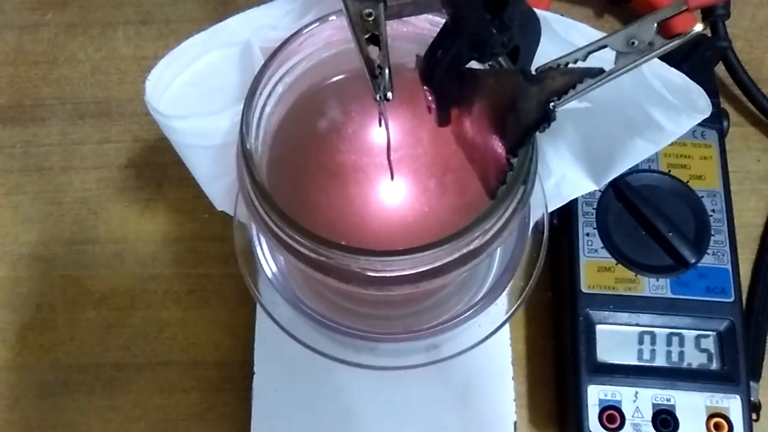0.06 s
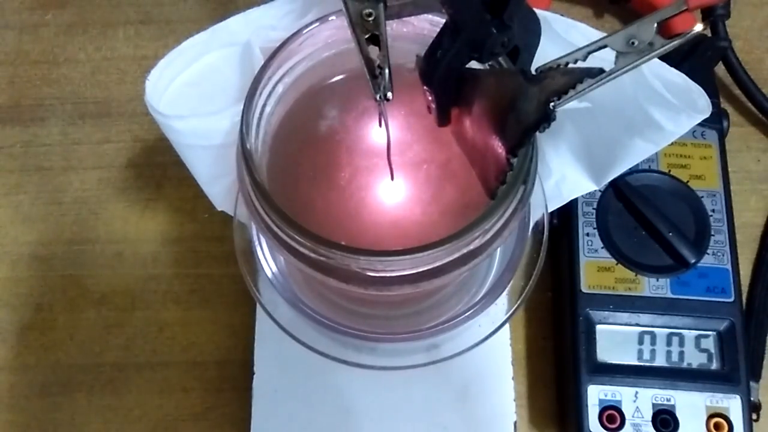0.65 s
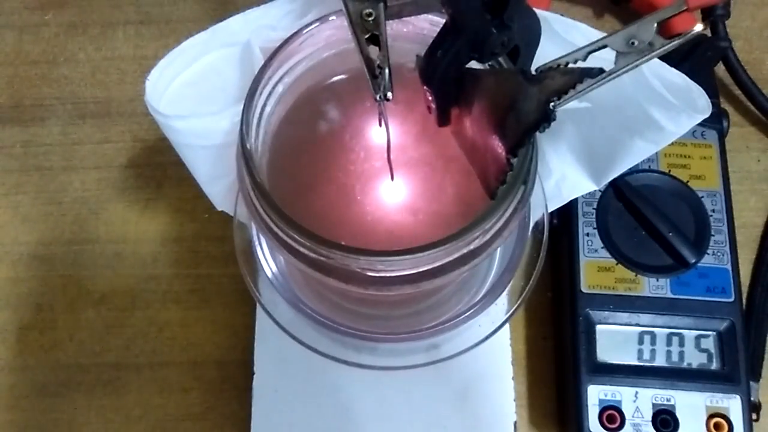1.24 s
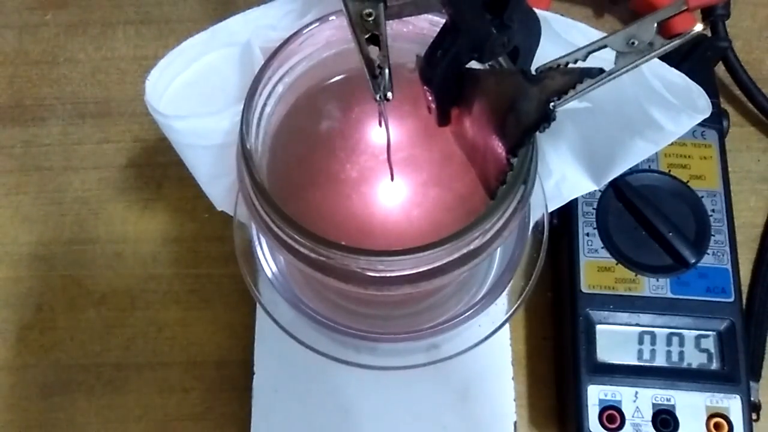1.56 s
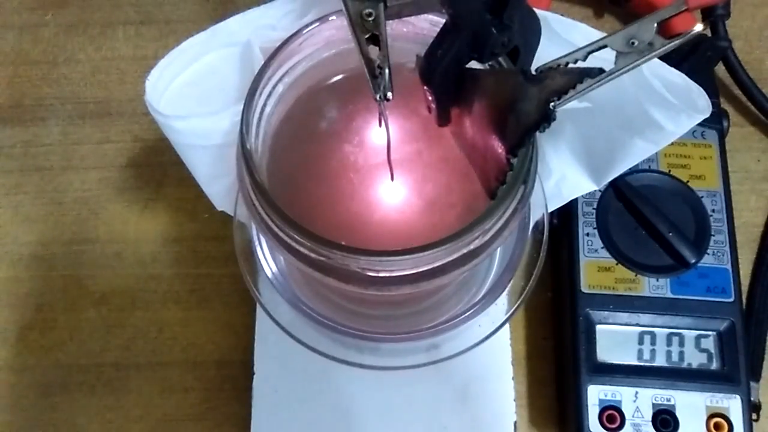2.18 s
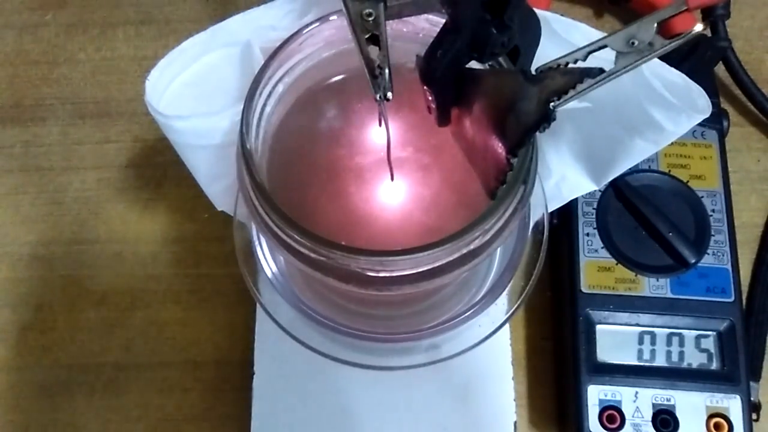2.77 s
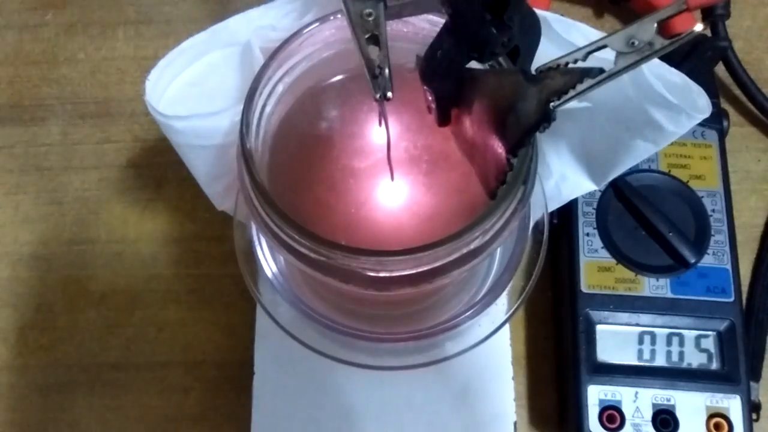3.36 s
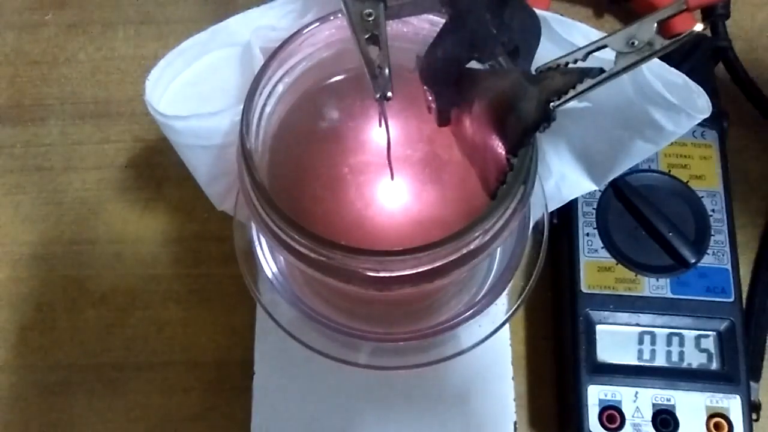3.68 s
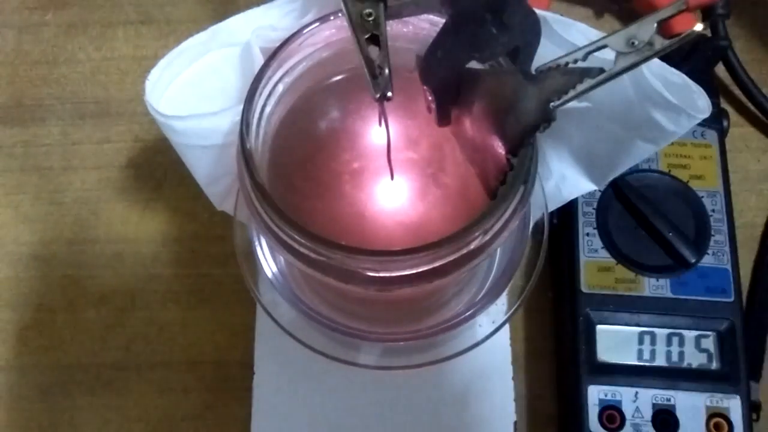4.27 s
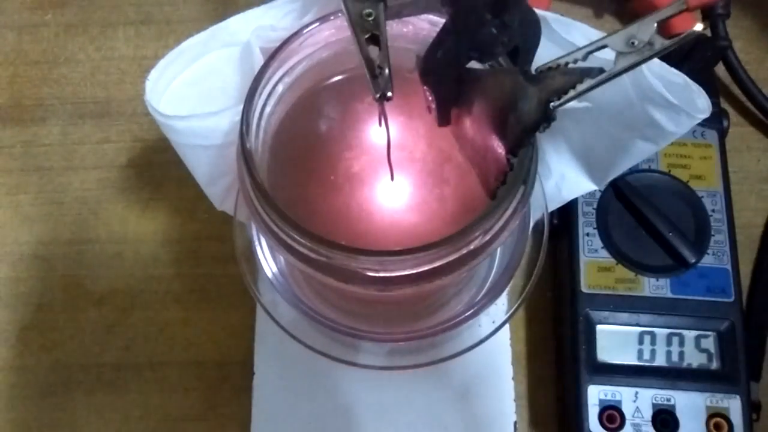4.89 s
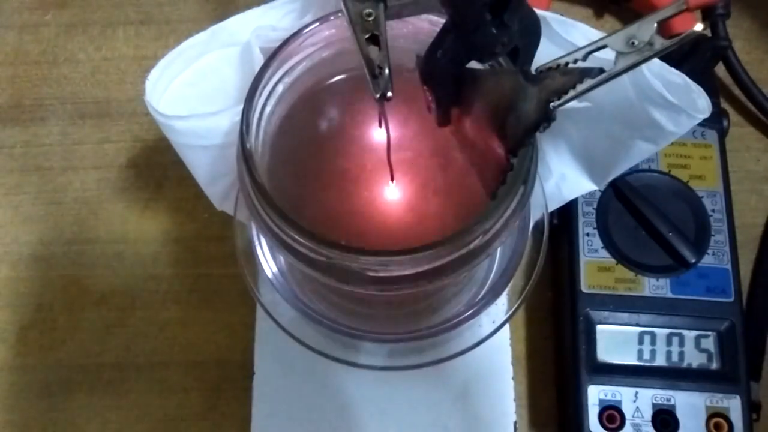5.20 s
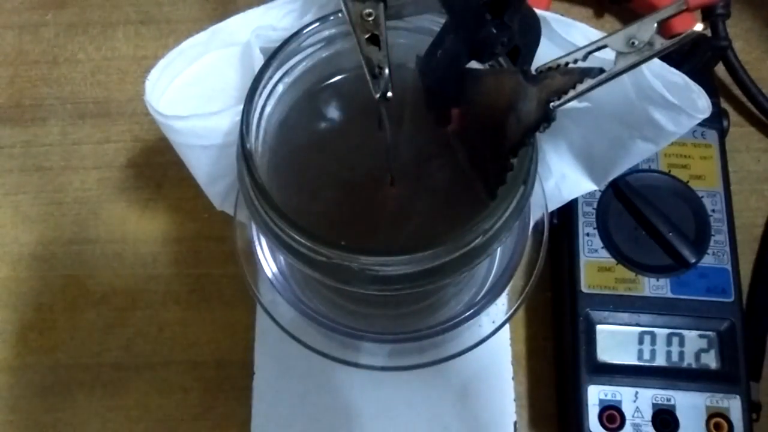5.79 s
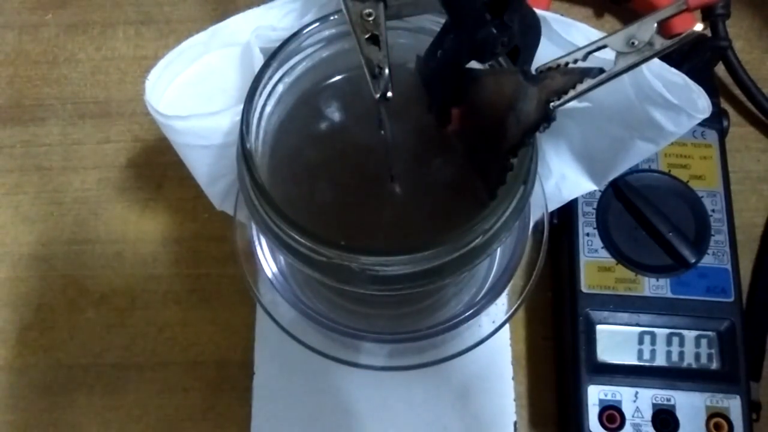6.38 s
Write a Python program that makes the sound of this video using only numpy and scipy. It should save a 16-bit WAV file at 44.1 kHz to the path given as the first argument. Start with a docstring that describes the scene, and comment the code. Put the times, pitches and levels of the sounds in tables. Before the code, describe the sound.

An electric discharge hisses and sizzles in a jar until a switch clicks off, then the hot wire softly fizzes and ticks.

```python
"""Plasma electrolysis in a glass jar: sparks sizzle round a wire in the liquid, throbbing with the
rectified mains over a faint supply hum. The power switch snaps off and the sizzle dies away in a
small room. The glowing wire then quenches: its vapour film ticks and breaks, and the liquid boils
on it in a short soft hiss. Mono, close by."""
import sys
import numpy as np
from scipy import signal
from scipy.fft import rfft, irfft, next_fast_len
from scipy.io import wavfile

SR = 44100
rng = np.random.default_rng(int(sys.argv[2]) if len(sys.argv) > 2 else 0)


def wav_out(sig):
    """Save sig, one row per channel (or a flat mono array), as 16-bit PCM at SR to the path in sys.argv[1]."""
    wavfile.write(sys.argv[1], SR, np.round(np.clip(np.atleast_2d(sig).T, -1, 1) * 32767).astype(np.int16))


N = 293265
T = np.arange(N) / SR
MAINS_HZ, POWER_OFF_S = 50, 5.276


def amp(db):
    """Decibels to gain."""
    return 10 ** (np.asarray(db) / 20)


def unit(x):
    """Scale to rms 1."""
    return x / np.sqrt(np.mean(x ** 2) + 1e-20)


def curve_at(points, hz):
    """Interpolate (frequency [Hz], value) points over log frequency."""
    f, value = np.transpose(points)
    return np.interp(np.log(hz + 1), np.log(f), value)


def add(mix, start_s, sound):
    """Mix a sound in at start_s."""
    part = mix[round(start_s * SR):][:len(sound)]
    part += sound[:len(part)]


def wander(hz):
    """Smooth random drift, rms 1, rolling off above hz."""
    f = np.fft.rfftfreq(N, 1 / SR)
    return unit(irfft(rfft(rng.standard_normal(N)) / np.sqrt(1 + (f / hz) ** 4), N))


def band(x, low_hz, high_hz):
    """Zero-phase band-pass, soft edges."""
    size = next_fast_len(N)
    f = np.fft.rfftfreq(size, 1 / SR) + 1
    return irfft(rfft(x, size) / (1 + (low_hz / f) ** 20) / (1 + (f / high_hz) ** 20), size)[:N]


def colour(x, spectrum, resonances=()):
    """Minimum-phase filter of unit energy: a broad spectrum plus resonances that ring on."""
    hz = abs(np.fft.fftfreq(4096, 1 / SR))
    peaks_db = sum(db * np.exp(-(2 * (hz - centre) / width) ** 2) for centre, width, db in resonances)
    log_gain = np.log(amp(curve_at(spectrum, hz) + peaks_db))
    impulse = np.fft.ifft(np.exp(np.conj(signal.hilbert(log_gain)))).real
    return signal.oaconvolve(x, impulse / np.linalg.norm(impulse))[:N]


def crackle(per_s, spread_db):
    """Random clicks of either sign, rms 1: many small, a few large."""
    size = amp(spread_db * np.minimum(rng.exponential(1, N), 5))
    return unit(size * rng.choice([-1, 1], N) * (rng.random(N) < per_s / SR))


def bursts(rows):
    """Noise puffs: instant attack, exponential decay."""
    out, t = np.zeros(N), T[:SR // 10]
    for start_s, db, decay_s in rows:
        add(out, start_s, amp(db) * np.exp(-t / decay_s) * rng.standard_normal(len(t)))
    return out


def discharge_gate(decay_s=0.0059):
    """1 while the discharge burns, falling to 0 after power-off."""
    return np.exp(-np.maximum(T - POWER_OFF_S, 0) / decay_s)


def room(x, wet_db, first_echo_s=0.003):
    """Small room: direct sound plus a diffuse tail whose treble dies first."""
    # reverberation (frequency [Hz], t60 [s])
    decay_times = [(150, 0.37), (1000, 0.28), (4000, 0.23), (8000, 0.28), (15000, 0.19)]
    echoes = rng.standard_normal(SR // 2) * (T[:SR // 2] > first_echo_s)
    hz, t, frames = signal.stft(echoes, SR, nperseg=256)
    tail = signal.istft(frames * amp(-60 * t / curve_at(decay_times, hz)[:, None]), SR)[1]
    wet = signal.oaconvolve(x, tail / np.linalg.norm(tail))[:N]
    return (x + amp(wet_db) * wet) / np.sqrt(1 + amp(wet_db) ** 2)


def room_tone(level_db=-62):
    """Faint steady rumble and hiss of the room."""
    # room noise (frequency [Hz], relative density [dB])
    spectrum = [(20, -26), (45, 0), (75, 5), (130, 0.5), (300, -7), (800, -14), (1700, -8.5), (3000, -34),
                (7000, -11.5), (15000, -23)]
    gain = amp(curve_at(spectrum, np.fft.rfftfreq(N, 1 / SR)))
    return amp(level_db) * unit(irfft(rfft(rng.standard_normal(N)) * gain, N))


def supply_hum(drift_db=2, drift_rad=0.5):
    """Multiples of twice the mains rate, unsteady in level and phase, while current flows."""
    # hum lines (frequency [Hz], rms level [dB])
    lines = [(100, -68), (200, -70), (300, -69)]
    hum = sum(amp(db + drift_db * wander(6.5)) * np.sin(2 * np.pi * hz * T + drift_rad * wander(5.3))
              for hz, db in lines)
    return np.sqrt(2) * hum * discharge_gate()


def switch(thump_attack_s=0.0046):
    """Power switch: a hard snap, contact bounce and the thump of its box."""
    # snap and bounces (time [s], level [dB], decay [s])
    snaps = [(5.2738, -7.5, .002), (5.275, -8, .003), (5.2785, -13, .0075)]
    # snap (frequency [Hz], relative density [dB])
    snap_spectrum = [(25, -50), (80, -25), (170, -14), (600, -24.5), (1100, -16), (1450, -2.5), (1800, -16),
                     (3000, -7), (4500, -2.5), (5100, -8), (5800, -2), (7600, -2), (10000, -8),
                     (15700, -24)]
    # box modes (frequency [Hz], level [dB], t60 [s])
    box_modes = [(195.4, -35, 0.15), (115, -47, .3), (388, -50, 0.25), (1380, -35, 0.051)]
    out, t = colour(bursts(snaps), snap_spectrum), T[:SR // 2]
    thump = sum(amp(db - 60 * t / t60) * np.sin(2 * np.pi * hz * t) for hz, db, t60 in box_modes)
    add(out, snaps[0][0], thump * (1 - np.exp(-t / thump_attack_s)))
    return out


def jar(x, spectrum, shifted=True):
    """Sound at the wire rings in the jar, in its early or its shifted colour."""
    # resonances and notches (centre [Hz], width [Hz], early gain [dB], shifted gain [dB])
    modes = [(324, 160, 1, 5), (641, 210, 5.5, 1.2), (771, 58, -6.5, -19), (999, 210, 6, 3.5),
             (1405, 160, 0.5, 3.5), (1495, 68, -9.5, -6.5), (1836, 24, -4, -2.3), (1966, 82, -9.5, -16.5),
             (2175, 80, -4, -6.5), (2248, 165, 4.5, 1.7), (2582, 180, -9.5, -9), (3340, 120, -0.5, -2.5),
             (3700, 346, 8, 8), (3870, 175, 3.5, -1), (4138, 240, 7, 4.8), (5380, 106, -5, -13),
             (6000, 810, -4.5, -5.5), (6276, 80, -8, -8), (6373, 410, 6, 6.5), (7060, 260, 3, -12),
             (7290, 530, -0.3, 5.5), (7490, 104, 6, -4.5), (7900, 190, 1.5, 0.5), (8400, 89, 5.5, 7.5),
             (9770, 1120, 5, 4), (10160, 300, -5.5, -4), (10440, 200, -1.5, -6), (10940, 301, -4, -9),
             (12900, 260, 8, 7), (14026, 160, 0, -5.6)]
    resonances = [(hz, width, late if shifted else early) for hz, width, early, late in modes]
    return colour(x, spectrum, resonances)


def film_flutter(decay_s, base_per_s=56, quickening_per_s3=70, jitter=0.2, uneven_db=3.0):
    """The vapour film taps the wire in near-regular puffs, faster as cooling thins it."""
    # flutter bouts (start [s], length [s], first level [dB], last level [dB])
    bouts = [(5.335, .08, -34, -42), (5.612, 0.16, -44, -44), (5.8, .24, -40, -36.5),
             (6.05, .13, -37.5, -29), (6.23, 0.14, -30, -40)]
    cooling_s = np.maximum(T - POWER_OFF_S, 0)
    rate_per_s = (base_per_s + quickening_per_s3 * cooling_s ** 2) * np.exp(jitter * wander(60))
    touches = np.diff(np.floor(np.cumsum(rate_per_s) / SR), prepend=0)
    strength = np.zeros(N)
    for start_s, length_s, first_db, last_db in bouts:
        active = (T >= start_s) & (T < start_s + length_s)
        strength += active * amp(np.interp(T, [start_s, start_s + length_s], [first_db, last_db]))
    kicks = touches * strength * amp(uneven_db * rng.standard_normal(N))
    envelope = signal.lfilter([1], [1, -np.exp(-1 / (decay_s * SR))], kicks + 1e-18)
    return envelope * rng.standard_normal(N)


def vapour_film(tick_decay_s=0.0031):
    """Film round the hot wire: bright ticks as it flutters, spits where it breaks."""
    # lone film touches (time [s], level [dB])
    lone_ticks = [(5.4705, -46), (5.486, -42), (5.5134, -46)]
    # tick (frequency [Hz], relative density [dB])
    tick_spectrum = [(500, -28), (3000, -8.5), (7000, -8), (10000, -3.5), (12500, 0.5), (15700, -7)]
    # film breaks (time [s], level [dB], decay [s])
    spits = [(5.5625, -34.5, .016), (5.626, -37, .01), (5.72, -42, .006), (6.372, -34, .005),
             (6.59, -35, .005)]
    # spit (frequency [Hz], relative density [dB])
    spit_spectrum = [(300, -37), (2500, -30), (5000, -12), (6700, 2), (7500, -8), (10000, -10),
                     (15000, -28)]
    ticks = film_flutter(tick_decay_s) + bursts([(s, db, tick_decay_s) for s, db in lone_ticks])
    return jar(ticks, tick_spectrum) + jar(bursts(spits), spit_spectrum)


def quench_boil(start_s=5.33, fade_in_s=0.06, flicker_db=0.7, lag_s_per_octave=0.018):
    """Bubbles form and collapse on the cooling wire; each change runs from coarse to fine."""
    # boiling (frequency [Hz], relative density [dB])
    spectrum = [(100, -34), (400, -19.5), (800, -21), (1100, -14), (1750, 2.5), (2300, -5.5), (4800, -7.5),
                (5100, -3), (5500, -7), (6600, -2), (10000, -10), (12500, -8), (15700, -14)]
    # boiling strength (time [s], level [dB])
    boil_levels = [(5.38, -58), (5.5, -66.5), (5.58, -55.5), (5.66, -58.5), (5.8, -51), (6.04, -50),
                   (6.29, -46), (6.57, -48), (6.63, -55.5)]
    # liquid reaches the metal (time [s], half length [s], gain [dB], centre [Hz], spread [octaves])
    surges = [(5.655, .045, 7.5, 1800, 1), (6.214, .04, 9, 3200, 1), (6.442, 0.049, 9.5, 6000, 2.9)]
    # bubble sizes, coarse to fine (low [Hz], typical [Hz], high [Hz], gain [dB])
    sizes = [(10, 1840, 2200, 0), (2100, 3200, 6300, -1.2), (5800, 7800, 10200, 4),
             (10000, 12500, 16000, -2.5)]
    bubbles = jar(crackle(per_s=7000, spread_db=2.5) * amp(flicker_db * wander(120)), spectrum)
    out, coarsest_hz = np.zeros(N), sizes[0][1]
    for low_hz, hz, high_hz, size_db in sizes:
        lagged_s = T - lag_s_per_octave * np.log2(hz / coarsest_hz)
        boil_db = np.interp(lagged_s, *np.transpose(boil_levels))
        surge_db = sum(db * np.exp(-((lagged_s - s) / half_s) ** 2 - (np.log2(hz / centre) / octs) ** 2)
                       for s, half_s, db, centre, octs in surges)
        out += unit(band(bubbles, low_hz, high_hz)) * amp(size_db + boil_db + surge_db)
    return out * np.clip((T - start_s) / fade_in_s, 0, 1)


def sizzle():
    """Thousands of tiny sparks a second, stronger on each mains half wave and in irregular spurts."""
    # spark (frequency [Hz], relative density [dB])
    spectrum = [(30, -48), (70, -33), (130, -33), (250, -32), (450, -22), (1000, -18), (1700, -1.5),
                (3000, -11.5), (5500, -6.5), (6700, 0.0), (8500, -6.5), (12500, -8.5), (15700, -18.5)]
    # brief band swells (time [s], half length [s], low [Hz], high [Hz], gain [dB])
    swells = [(3.45, 0.28, 895, 1130, 2), (3.618, 0.14, 3600, 3980, 4.5), (4.65, .35, 6250, 6650, 3.5),
              (4.9, 0.32, 14900, 15700, 3)]
    level_db, growth_db_per_s = -20.8, 0.0373
    throb_db, sputter_db, spurt_db, hiss_flicker_db = 1.0, 0.5, 0.5, -0.08
    body_gain_db, body_throb_db, body_drift_db = -9.5, 0.5, 0.62
    shift_mid_s, shift_length_s = 3.93, 0.37
    ripple = np.sin(2 * np.pi * 2 * MAINS_HZ * T)
    drive_db = throb_db * ripple + sputter_db * wander(230) + spurt_db * wander(28)
    sparks = crackle(per_s=13000, spread_db=2.5) * amp(drive_db)
    shift = np.clip((T - shift_mid_s) / shift_length_s + 0.5, 0, 1)
    ringing = (1 - shift) * jar(sparks, spectrum, shifted=False) + shift * jar(sparks, spectrum)
    for s, half_s, low_hz, high_hz, db in swells:
        ringing += (amp(db) - 1) * np.exp(-((T - s) / half_s) ** 2) * band(ringing, low_hz, high_hz)
    hiss = unit(band(ringing, 2673, 18000) * amp(hiss_flicker_db * wander(34)))
    # larger vapour bubbles follow the mains more closely than the fine hiss
    body = unit(band(ringing, 10, 2790) * amp(body_throb_db * ripple))
    body *= amp(body_gain_db + body_drift_db * wander(3.5))
    return (hiss + body) * amp(level_db + growth_db_per_s * T) * discharge_gate()


def scene():
    """Jar and switch in the room, over hum and room tone; both channels alike."""
    wire = room(sizzle() + quench_boil(), wet_db=-8.5) + room(vapour_film(), wet_db=-5)
    mono = wire + room(switch(), wet_db=-7.5) + supply_hum() + room_tone()
    return np.array([mono, mono])


def record(dry):
    """Steep linear-phase low-pass."""
    cutoff_hz = 15780
    taps = signal.firwin(1023, cutoff_hz, window=("kaiser", 9), fs=SR)
    return signal.oaconvolve(dry, taps[None], "same", axes=1)


dry = scene()
out = record(dry)
wav_out(out)
```